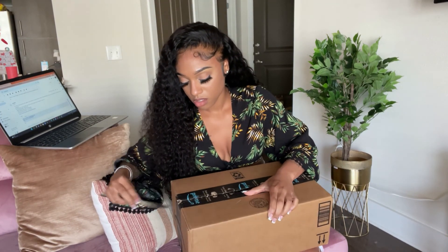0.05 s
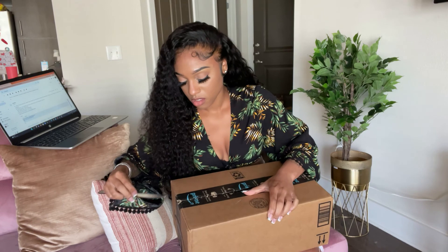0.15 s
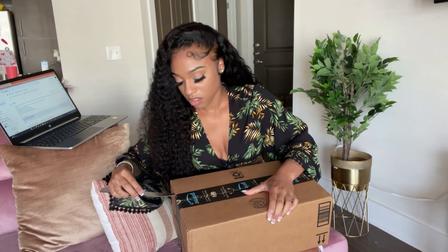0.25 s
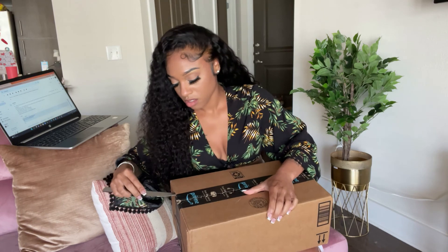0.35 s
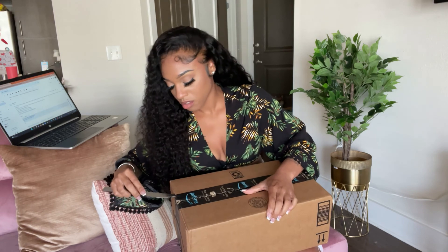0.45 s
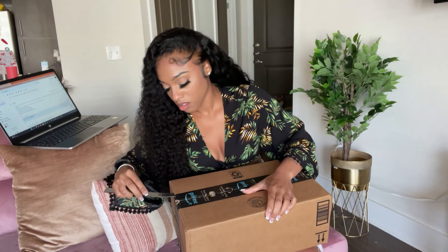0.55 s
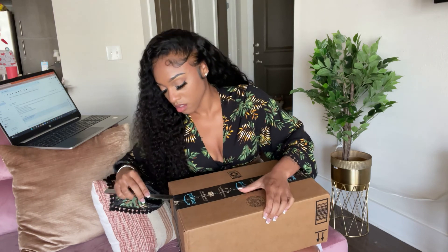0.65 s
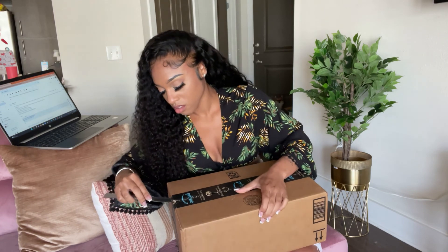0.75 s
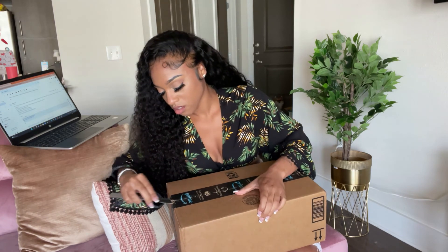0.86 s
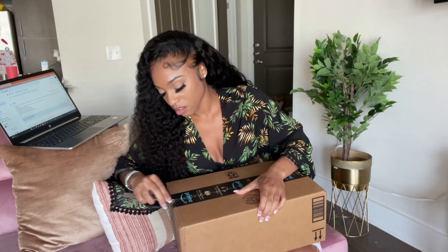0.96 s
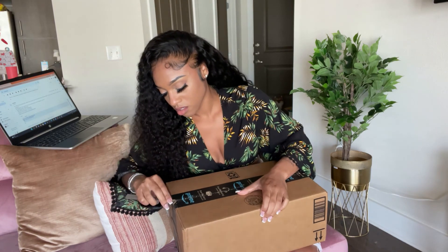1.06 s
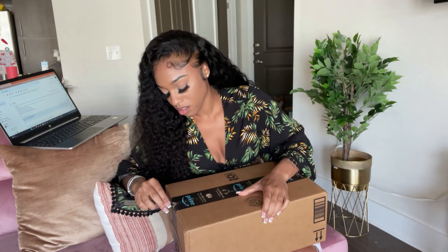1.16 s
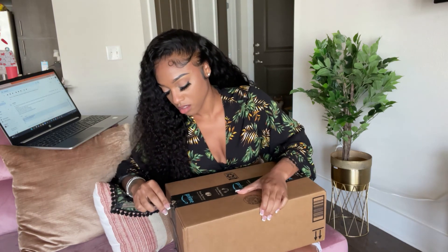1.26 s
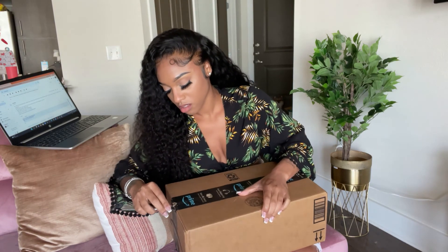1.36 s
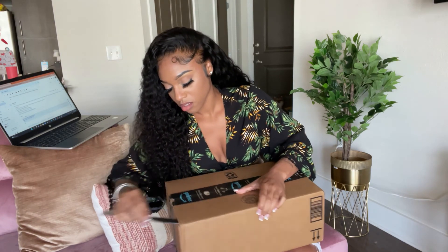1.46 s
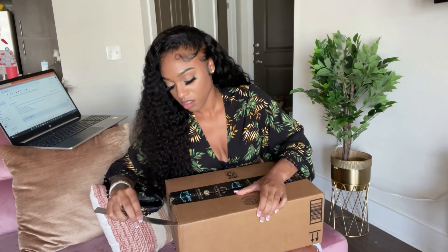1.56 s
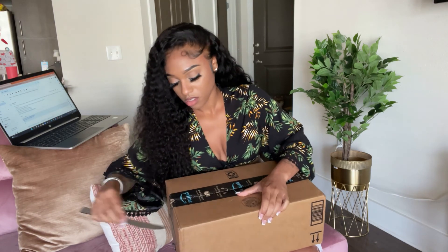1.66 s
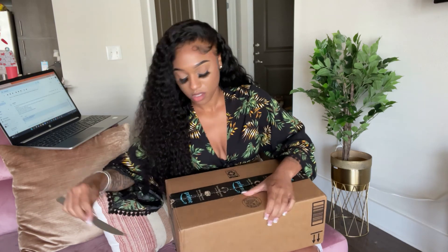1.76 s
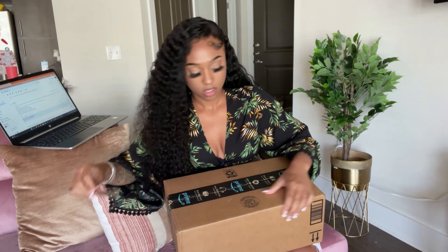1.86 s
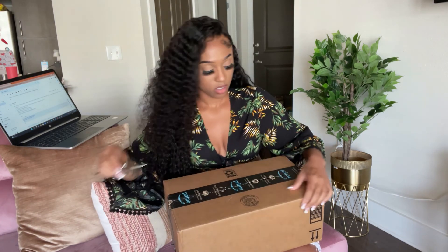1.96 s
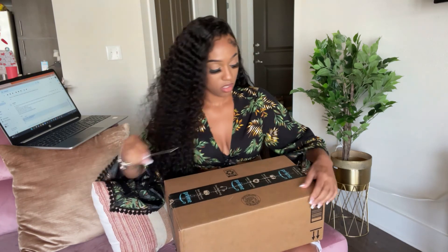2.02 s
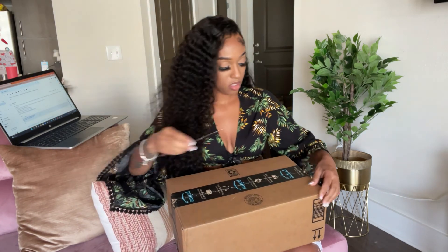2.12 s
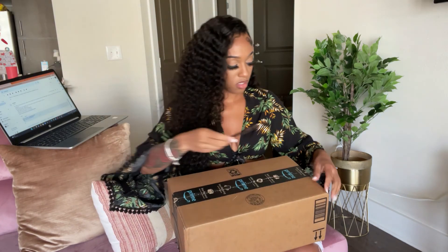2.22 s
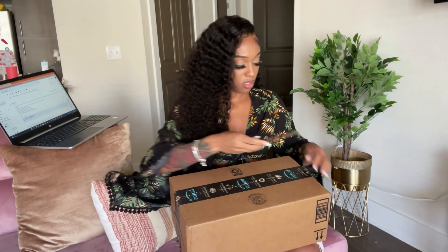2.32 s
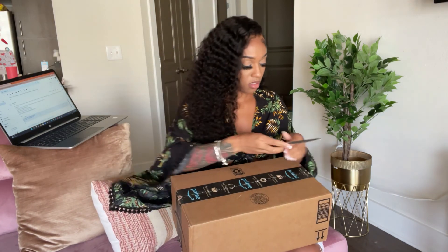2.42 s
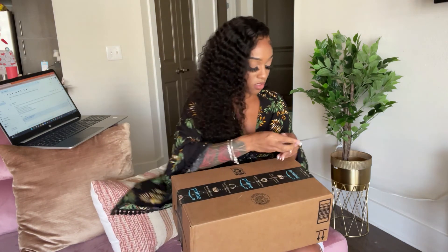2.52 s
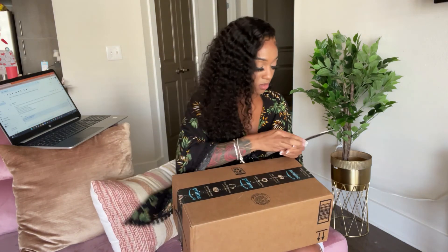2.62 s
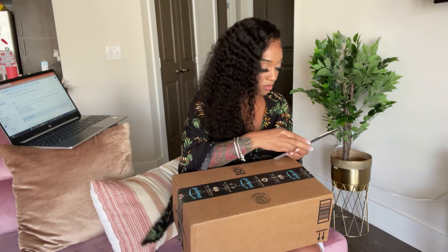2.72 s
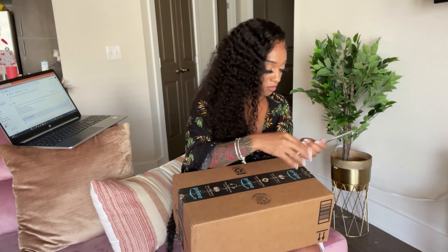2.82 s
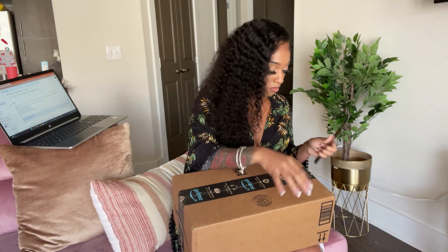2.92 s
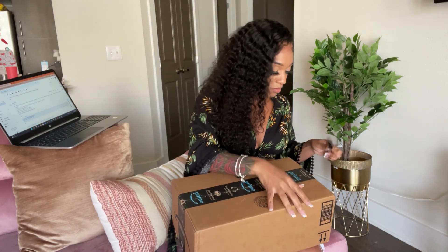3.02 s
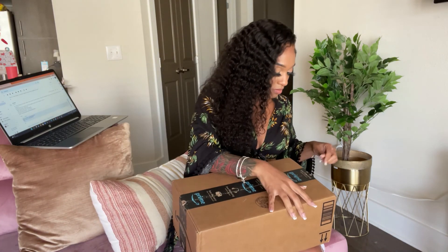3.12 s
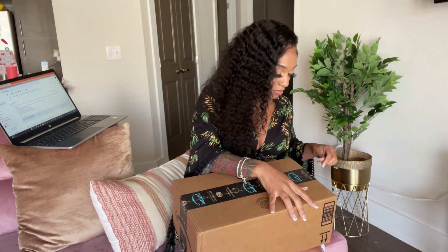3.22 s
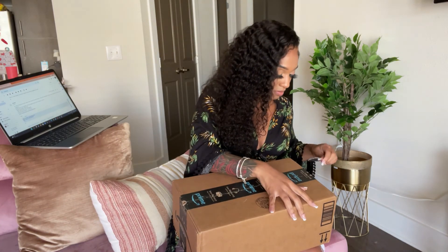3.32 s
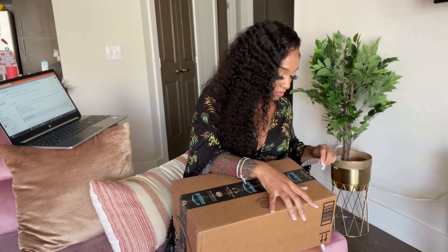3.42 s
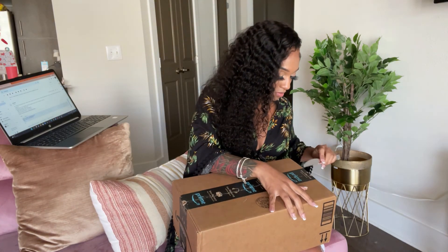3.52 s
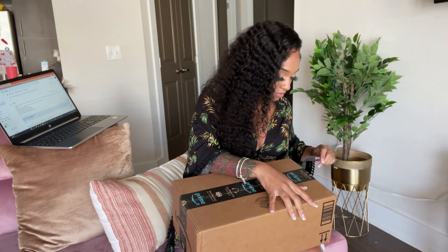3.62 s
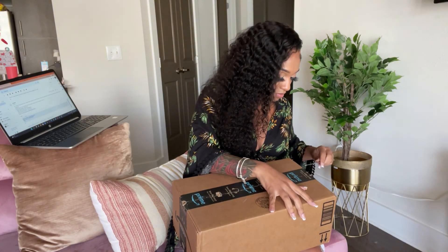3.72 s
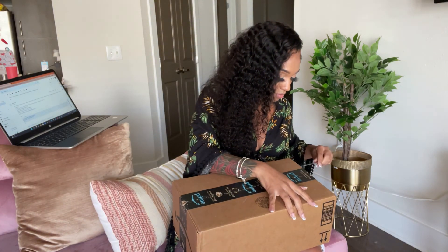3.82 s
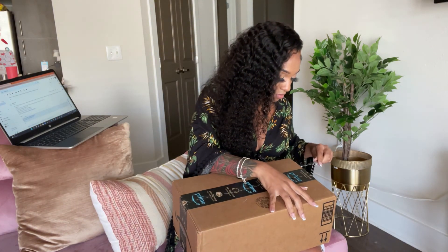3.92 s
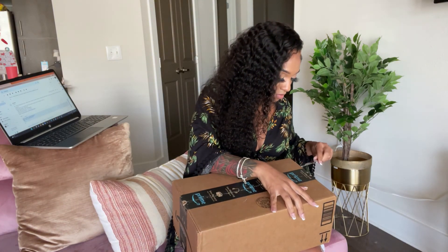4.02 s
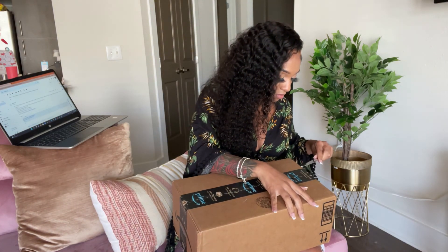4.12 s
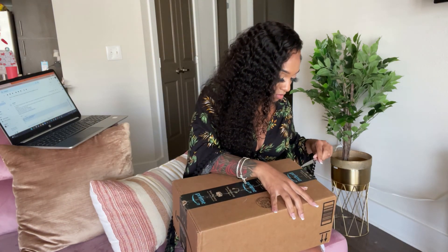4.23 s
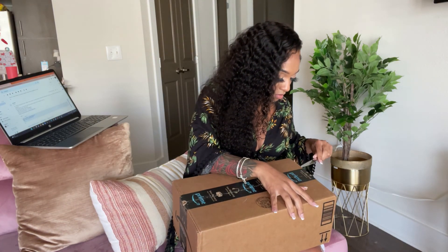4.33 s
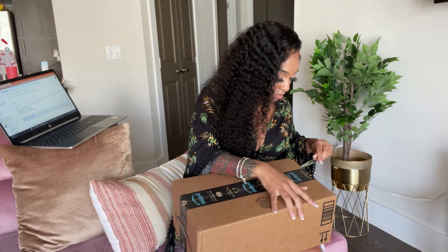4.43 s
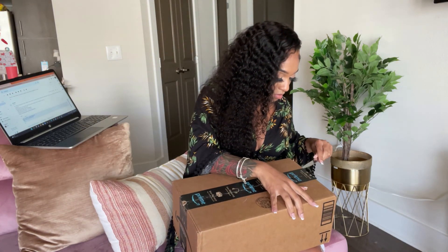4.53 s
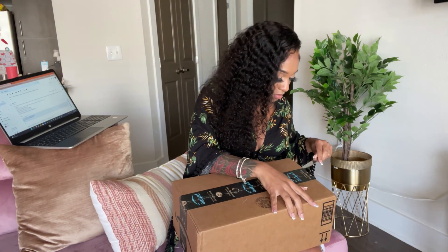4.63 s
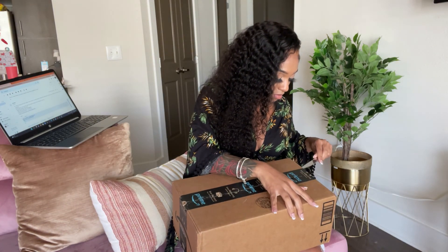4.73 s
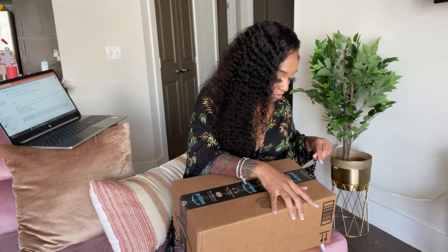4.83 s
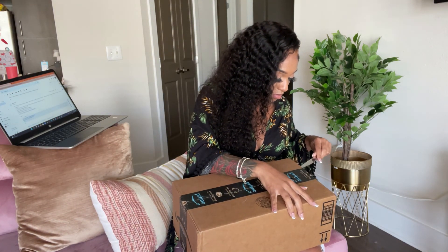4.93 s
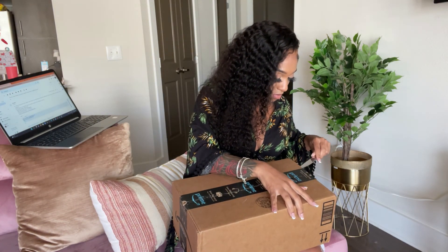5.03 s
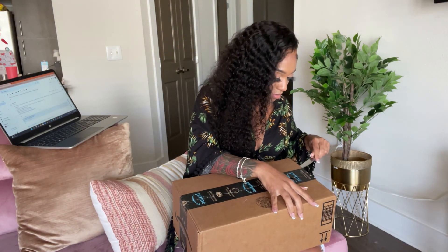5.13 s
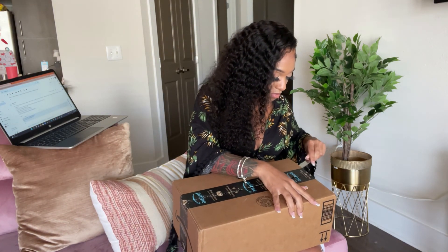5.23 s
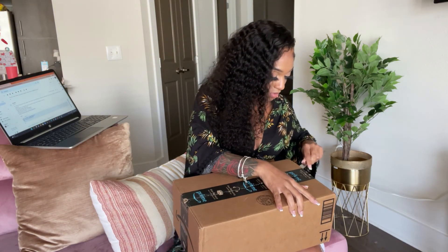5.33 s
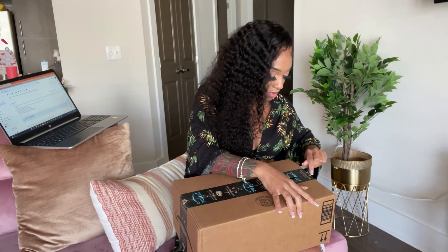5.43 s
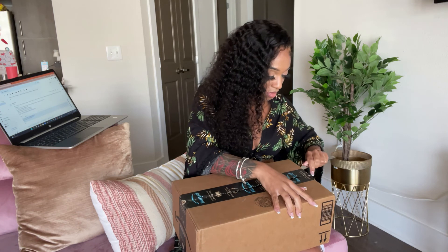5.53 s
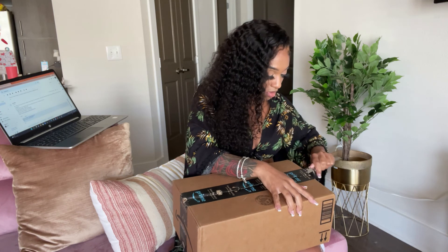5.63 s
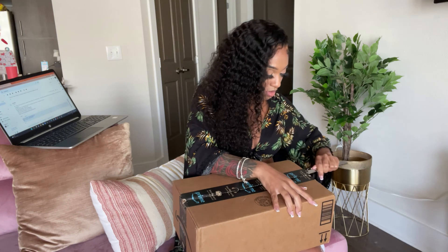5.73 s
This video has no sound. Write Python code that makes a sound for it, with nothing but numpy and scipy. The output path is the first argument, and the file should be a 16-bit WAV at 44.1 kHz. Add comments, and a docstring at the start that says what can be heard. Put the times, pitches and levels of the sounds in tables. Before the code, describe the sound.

A knife slits box tape. Dry clicks and scrapes open, then three crackling, boxy bursts get stronger, with soft cushion thumps. Cloth brushes as the hands change over, a faint airy swish passes, and a hand lands on the cardboard. Mostly low hum and soft room air remain until a last short tearing cluster. The microphone is near, in a lightly reverberant room.

```python
"""A blade saws and slits the packing tape of a cardboard box in a living room, near a two-port microphone.
Stick-slip clicks and single knocks ring the box panels as decaying sines; tape and sleeve hiss as fine
grains, jolts add snapping fibres and a thump of the cushions, and a sweep of the knife hand sings faintly.
Sparse decaying taps make the room's answer; steady hum tones lie under soft, slowly swelling room air."""
import sys
import numpy as np
from scipy import signal
from scipy.fft import rfft, irfft, next_fast_len
from scipy.io import wavfile
from scipy.ndimage import uniform_filter1d

SR = 44100
rng = np.random.default_rng(int(sys.argv[2]) if len(sys.argv) > 2 else 0)


def transcribe(u):
    """Save the signal u as a 16-bit wav file named by the first command-line argument.

    u: samples, shape (n,) or (channels, n), limited to [-1, 1]; the rate is SR.
    q: integer samples, one column per channel.
    """
    v = np.clip(np.atleast_2d(u).T, -1, 1)
    q = np.round(v * 32767).astype(np.int16)
    wavfile.write(sys.argv[1], SR, q)


N = 254447

# box panel modes: (frequency [Hz], relative level [dB], t60 before any lengthening [s])
BOX_MODES = [(96, 1, 0.029), (138, -10, 0.041), (189.5, -8.5, 0.034), (269, 2, 0.041), (350, 1.5, 0.048),
             (427.4, 3, 0.035), (507.8, 0.5, 0.067), (635, 5, 0.033), (747.5, -6, 0.11), (882, -9.5, 0.038),
             (1008, -5.5, 0.018), (1179, -12.5, 0.049), (1276, -12, 0.037), (1370, -14.5, 0.038),
             (1512, -19, 0.05), (1695, -15, 0.05), (1770, -15.5, 0.017), (1983, -18, 0.049),
             (2230, -12.5, 0.02), (2443, -16.5, 0.021), (2620, -12.5, 0.014), (3000, -37, 0.0075),
             (3120, -11, 0.01), (3690, -15.5, 0.0074)]
# spectrum of snapping tape fibres: (frequency [Hz], relative level [dB])
CRACK_SPECTRUM = [(800, 4), (1500, 27), (4000, 20.5), (6000, 19.5), (9000, 14.5), (12000, 17.5),
                  (16000, 7.5)]
MODE_HZ = np.array(BOX_MODES)[:, 0]
STIFF_ABOVE_HZ = 850
FIDGET_S = 0.039  # smoothing span of hand motion


def handling():
    """Drive of middle panels, stiff panels, rocking, hiss; rest, slides and jolts add in power."""
    # slides of blade, hand and sleeve: (peak time [s], swell [s], fade [s], rubbing on middle panels [dB],
    # rubbing on stiff panels [dB], hiss [dB])
    slides = [(.05, 0.043, 0.018, -41, -58, -54), (0.33, 0.18, 0.1, -56, -61.5, -72),
              (0.54, 0.057, 0.03, -55.5, -56, -59.5), (0.7, 0.037, 0.12, -40.5, -45, -50),
              (1.03, 0.055, 0.2, -53.5, -57.5, -60.5), (1.6, 0.078, 0.047, -47, -48, -58),
              (1.886, 0.08, 0.063, -83, -51.5, -41.5), (2.62, 0.094, 0.32, -70, -68, -66),
              (2.97, 0.11, 0.051, -58.5, -74, -58.5), (3.84, 0.018, 0.038, -52.5, -61.5, -72),
              (4.91, 0.028, 0.047, -53.5, -62.5, -73), (5.2, 0.055, 0.044, -56, -62, -64.5),
              (5.33, 0.046, 0.059, -63, -61, -60), (5.55, 0.032, 0.058, -55, -73, -60),
              (5.74, .05, .1, -44, -67, -73)]
    # blade breaks through or hand lands: (peak time [s], rise [s], scraping on middle panels [dB],
    # scraping on stiff panels [dB], rocking [dB], hiss [dB])
    jolt_list = [(0.008, 0.18, -34, -42, -51, -40.5), (0.786, 0.012, -32.5, -38, -33, -33),
                 (1.19, 0.018, -37, -37, -27, -30.5), (1.411, 0.011, -43, -49, -28, -28.5),
                 (1.459, 0.031, -30, -57, -29, -28.5), (3.002, 0.021, -37, -40, -54, -52.5),
                 (5.607, 0.018, -34.5, -49, -32.5, -30), (5.645, .01, -32.5, -49, -44, -32.5),
                 (5.68, .02, -40, -57, -39, -54)]
    # hands resting on the box: (middle panels [dB], stiff panels [dB], rocking [dB], hiss [dB])
    rest_db = (-78, -69, -55, -75)
    # fall after a jolt: (middle panels [dB/s], stiff panels [dB/s], rocking [dB/s], hiss [dB/s])
    settle_db_per_s = (105, 121, 93, 400)
    # unsteady hands, rms: (middle panels [dB], stiff panels [dB], rocking [dB], hiss [dB])
    fidget_db = (2.2, 1.2, 3.3, 1.6)
    slide_edge_db = -2  # one swell before and one fade after the peak
    slide_rock_db = -5.5  # rocking re rubbing on middle panels
    rise_from_db = -20  # one rise before the jolt peak

    t = np.arange(N) / SR
    power = np.ones((4, N)) * gain_of(np.array(rest_db)[:, None]) ** 2
    for peak_s, swell_s, fade_s, rub_db, stiff_db, hiss_db in slides:
        shape_db = slide_edge_db * ((t - peak_s) / np.where(t < peak_s, swell_s, fade_s)) ** 2
        peak_db = np.array([[rub_db], [stiff_db], [rub_db + slide_rock_db], [hiss_db]])
        power += gain_of(peak_db + shape_db) ** 2

    jolt_power = np.zeros((4, N))
    for peak_s, rise_s, *peak_db in jolt_list:
        rise_db = rise_from_db * (peak_s - t) / rise_s
        settle_db = np.array(settle_db_per_s)[:, None] * (peak_s - t)
        shape_db = np.where(t < peak_s, rise_db, settle_db)
        jolt_power += gain_of(np.array(peak_db)[:, None] + shape_db) ** 2

    fidget = gain_of([db * np.clip(wander(FIDGET_S), -2, 2) for db in fidget_db])
    return np.sqrt(power + jolt_power) * fidget, np.sqrt(jolt_power)


def dragging(drives):
    """Stick-slip clicks of the blade ring the panels, most near the touch; rocking moves the lowest."""
    # where the blade presses: (time [s], middle panel [Hz], stiff panel [Hz])
    touch = [(0, 430, 1210), (.66, 477, 1160), (.75, 410, 1130), (.9, 400, 1270), (1.19, 430, 2170),
             (1.3, 400, 2150), (1.41, 350, 1200), (1.5, 400, 1320), (3, 350, 1010), (4.9, 498, 1050),
             (5.2, 483, 1310), (5.28, 506, 2150), (5.4, 470, 2150), (5.6, 460, 1300), (5.66, 400, 2100),
             (5.77, 430, 1100)]
    middle_reach_db, stiff_reach_db = 8, 2.5  # touched panel re far ones
    touch_wander = .06  # rms share of touched frequency

    touch_s, *touched = np.transpose(touch)
    low, stiff = MODE_HZ < 200, MODE_HZ > STIFF_ABOVE_HZ
    signs = rng.choice([-1., 1.], (len(BOX_MODES), 1))
    clicks = slips(1500, 3.15)
    rings = signal.oaconvolve(clicks[None], signs * panels(), axes=1)[:, :N]
    roam = 1 + touch_wander * wander(FIDGET_S)
    parts = []
    groups = (~low & ~stiff, stiff)
    for group, under_hz, reach_db in zip(groups, touched, (middle_reach_db, stiff_reach_db)):
        touched_hz = np.interp(np.arange(N) / SR, touch_s, under_hz) * roam
        share = gain_of(reach_db * nearness(touched_hz)[group])
        ring_power = np.mean(rings[group] ** 2, axis=1, keepdims=True)
        power = (share ** 2 * ring_power).sum(axis=0)
        parts.append((share * rings[group]).sum(axis=0) / np.sqrt(power))
    parts.append(evened(rings[low].sum(axis=0)))
    return sum(drive * part for drive, part in zip(drives, parts))


def slips(per_s, spread_db):
    """Random clicks of either sign, a few of them large."""
    size = gain_of(spread_db * np.minimum(rng.exponential(1, N), 4)) * rng.choice([-1., 1.], N)
    return size * (rng.random(N) < per_s / SR)


def panels(bend=1, linger=1):
    """Decaying sine of each panel after one blow; bend scales pitch, linger scales t60."""
    t = np.arange(SR // 4) / SR
    hz, db, t60_s = np.transpose(BOX_MODES)[:, :, None]
    return gain_of(db - 60 * t / (t60_s * linger)) * np.sin(2 * np.pi * hz * bend * t)


def nearness(touched_hz):
    """Closeness of each panel to the touched one in log frequency, 0-1."""
    octaves = np.log2(MODE_HZ[:, None] / touched_hz)
    return np.exp(-(octaves / .22) ** 2)


def knocks():
    """Blows ring panels through a soft contact, stiff ones crumple on; the tape adds a short crack."""
    # single snaps and knocks: (time [s], middle-panel peak [dB], low panels re middle [dB],
    # stiff panels re middle [dB], tape crack re middle [dB], struck middle panel [Hz],
    # struck stiff panel [Hz], struck panels' emphasis [dB], their t60 factor [1], contact time constant [ms])
    blows = [(0.007, -29, -30, -0.5, -6, 450, 2300, 6.5, 1.3, 0.051),
             (0.018, -25, -27, -35, -5.5, 480, 1200, 14, 3.2, 0.14),
             (0.325, -48.5, 9, -11, 5.5, 510, 1200, 13, 0.97, .03),
             (0.739, -33, 0, 4.5, 2, 406, 1090, 22, 0.87, 0.055),
             (0.761, -41, 16, -17, -25, 190, 1200, 14, 1.6, 0.27),
             (0.772, -22, -19, -9, 4.5, 420, 1110, 7.6, 1, 0.028),
             (0.779, -21.5, -1, -2.5, 3.5, 400, 1150, 10, 1.2, 0.038),
             (0.79, -31.5, -20, 10, 11, 406, 1220, 14, 0.57, 0.03),
             (0.808, -27, -14, 3, -9, 417, 1290, 13, 0.79, 0.052),
             (0.817, -27, -1, -11, -23, 191, 1200, 26, 1.3, 0.11),
             (0.838, -29, -15, 2.5, 2, 358, 1190, 7.1, 0.72, 0.1),
             (0.858, -35, -12, 7, 2, 420, 2240, 11, 1.3, 0.029),
             (0.975, -33.5, 0.5, -26, -23, 370, 1200, 5.7, 0.92, 0.34),
             (1.177, -37, -1, 14, 8, 580, 1900, 7, 1.9, 0.023),
             (1.188, -26, -14, 2, 7.5, 500, 1490, 7.8, 0.55, 0.066),
             (1.193, -24, -15, 3.5, 6, 503, 1400, 5.2, 0.94, 0.034),
             (1.198, -20.5, -18, 1.5, -16, 580, 1000, 11, 1.1, 0.028),
             (1.203, -24, 3, -1, -14, 290, 2220, 14, 1.7, 0.031),
             (1.211, -28, 11.5, 4.5, -25, 144.5, 2250, 24.5, 1.5, 0.031),
             (1.228, -31.5, -10, 6, -15, 480, 2370, 18, 1.7, 0.036),
             (1.24, -34, 8.5, 6, -25, 250, 950, 20, 1, .05),
             (1.408, -21.5, -12, 5.5, -10, 735, 2320, 14, 0.93, 0.029),
             (1.413, -13, -7, -5, -4.5, 358, 1880, 19, 1, 0.025),
             (1.422, -16, -1, -18, -26, 302, 1200, 12, 0.86, 0.14),
             (1.429, -18, 1, 6, -23, 290, 1110, 8.2, 1.6, 0.05),
             (1.435, -23, 2, -8, -16, 270, 1120, 14, 0.57, 0.079),
             (1.443, -19, -7, -6, -20, 344, 2370, 9.5, 1.4, 0.021),
             (1.454, -20.5, -19, 2, -22, 150, 1060, 6.3, 0.76, 0.058),
             (1.465, -25, -14, 0, -4, 507, 1930, 21, 1.4, 0.032),
             (1.481, -27, -1, -11, -20, 400, 1300, 12, 1.1, 0.044),
             (1.506, -32.5, 8, 2, -15, 238, 1300, 9.3, 1.2, 0.048),
             (1.609, -47, -6, 17, 14.5, 470, 1200, 8.3, 0.75, 0.033),
             (2.783, -46, -12, -7, 6.5, 536, 1180, 9.5, 1.3, 0.035),
             (2.994, -26, -21, 4.5, -17, 750, 1000, 25, 1.5, 0.022),
             (2.997, -23, -14, -23, -40, 348, 1000, 24, 1.85, 0.12),
             (3.011, -32, -22, 0, -22, 710, 1400, 11, 1.6, 0.04),
             (3.034, -32, -22, 5, -17, 735, 1770, 6.7, 1.5, 0.028),
             (3.059, -46, -15, -13, -35, 350, 1000, 16, .6, .1),
             (3.449, -35, -4.5, -15.5, -15, 410, 1200, 7.3, 2, 0.16),
             (4.894, -41.5, 4.5, -3.5, -30, 483, 1030, 14, 3.3, 0.1),
             (5.18, -39, -17, -3, -8, 454, 2300, 6.7, 1.7, 0.032),
             (5.207, -43, -24, -19, -30, 446, 1200, 21, 1.4, .08),
             (5.258, -47, -10, 10, 6, 627, 2130, 10, 1, 0.01),
             (5.547, -54.5, -19, 21, 28.5, 390, 3470, 23, 1.4, 0.013),
             (5.594, -40, -19, 7, -12, 450, 1290, 12, 1.5, 0.066),
             (5.605, -27, -15, -2, -8, 430, 990, 7.4, 1.2, .05),
             (5.612, -24, -24, 2, -9, 480, 1300, 8.1, 2.2, 0.056),
             (5.618, -24.5, -25, 0, -15, 480, 910, 10, 1.5, 0.094),
             (5.648, -19.5, -20, 5.5, -3, 537, 970, 27, 0.55, 0.085),
             (5.649, -30, -22, 10.5, -8, 547, 2150, 34, 0.73, 0.025),
             (5.653, -15, -16, -11, -22, 624, 1260, 13, 1.35, 0.048),
             (5.657, -26, 4, -8, -25, 285, 900, 16, 1.7, 0.092),
             (5.673, -28, 12, -7, -25, 105, 900, 15, 1, 0.27),
             (5.737, -34, 7, -11, -27, 140, 1000, 21, 2.1, 0.15)]
    out, t = np.zeros(N + SR), np.arange(SR // 20) / SR
    low, stiff = MODE_HZ < 300, MODE_HZ > STIFF_ABOVE_HZ
    grit = rng.standard_normal((len(blows), 2, len(t) + len(BOX_MODES)))
    for settings, (noise, crumbs) in zip(blows, grit):
        s, db, low_db, stiff_db, crack_db, hz, stiff_hz, focus_db, linger, contact_ms = settings
        near = np.maximum(nearness(hz), nearness(stiff_hz))
        bend = 1 + noise[len(t):, None] / 50
        signs = np.sign(crumbs[len(t):, None])
        spot = gain_of(focus_db * near) * panels(bend, linger ** near) * signs
        press = t * np.exp(-t / (contact_ms / 1000))  # longer contact sounds duller
        spot = signal.oaconvolve(spot, press[None], axes=1)[:, :spot.shape[1]]

        crumple = (t == 0) + gain_of(-29.5 - 60 * t / 0.091) * crumbs[:len(t)]
        rattle = signal.oaconvolve(spot[stiff].sum(axis=0), crumple)[:spot.shape[1]]
        groups = spot[~low & ~stiff].sum(axis=0), spot[low].sum(axis=0), rattle
        levels_db = (0, low_db, stiff_db)
        blow = sum(gain_of(g) * ring / abs(ring).max() for g, ring in zip(levels_db, groups))

        fade = gain_of(-60 * t / .014) * np.minimum(t / .0003, 1)
        z = rfft(noise[:len(t)] * fade)
        snap = irfft(z / abs(z), len(t))  # flat spectrum
        crack = coloured(snap, CRACK_SPECTRUM) * np.sqrt(fade)
        blow[:len(t)] += gain_of(crack_db) * crack / abs(crack).max()
        out[round(s * SR):][:len(blow)] += gain_of(db) * blow
    return out[:N]


def hiss(drive):
    """Tape fibres and cloth: dense fine grains."""
    # (frequency [Hz], relative level [dB])
    hiss_spectrum = [(500, -2.5), (1500, 0), (2500, -2), (4000, -6), (7000, -6), (11000, -7),
                     (16000, -10.5)]
    return drive * evened(coloured(slips(9000, 3.1), hiss_spectrum))


def tearing(rock, rip):
    """In a jolt single fibres snap, and the cushions thump under the box."""
    # thump: (level [dB], spectrum of (frequency [Hz], relative level [dB]))
    thump_db, thump_spectrum = -35, [(20, -16), (35, 15), (60, -7), (90, -25), (200, -72)]
    crackle_db, crackle_per_s = -8, 400  # level re jolt hiss
    snaps = gain_of(crackle_db) * rip * evened(coloured(slips(crackle_per_s, 4), CRACK_SPECTRUM))
    rumble = evened(coloured(rng.standard_normal(N), thump_spectrum))
    return snaps + gain_of(thump_db) * rock * rumble


def swish():
    """Sweep of the knife hand: noise in narrow bands that swell, drift upward and fade."""
    # (frequency at mid-sweep [Hz], width of each of two poles [Hz], level before the swell [dB])
    swish_bands = [(2750, 500, -75), (4950, 380, -71), (7200, 450, -70)]
    middle_s, spread_s, glide = 2.92, .045, .02  # glide: pitch share either side of the middle
    t = np.arange(N) / SR
    place, out = (t - middle_s) / spread_s, np.zeros(N)
    for hz, width_hz, db in swish_bands:
        gliding_hz = hz * (1 + glide * np.tanh(place))
        carrier = np.exp(2j * np.pi * np.cumsum(gliding_hz) / SR)
        r = np.exp(-np.pi * width_hz / SR)
        two_poles = np.convolve([1, -r], [1, -r])
        slow = signal.lfilter([1], two_poles, rng.standard_normal(N) / carrier)
        out += gain_of(db) * evened((carrier * slow).real)
    return out * np.exp(-place ** 2 / 2)


def scatter(t60_s):
    """Short cloud of reflections: decaying noise whitened to leave the colour nearly alone."""
    t = np.arange(SR // 20) / SR
    z = rfft(rng.standard_normal(len(t)) * gain_of(-60 * t / t60_s))
    return irfft(z / abs(z), len(t)) * (t < t[-1] / 2)


def tails(start):
    """Two unrelated room tails of sparse taps, each band dying at its own speed, energy 1."""
    # (frequency [Hz], t60 [s])
    room_t60 = [(100, 0.13), (300, 0.6), (1000, 0.67), (4000, 0.86), (12000, 0.45)]
    taps = np.zeros((2, SR))
    slots = np.arange(start, SR - 20, 20)
    at = slots + rng.integers(0, 20, (2, len(slots)))
    np.put_along_axis(taps, at, rng.choice([-1., 1.], at.shape), 1)
    hz, t, z = signal.stft(taps, SR, nperseg=256)
    f, t60_s = np.transpose(room_t60)
    decay = gain_of(-60 * t / np.interp(hz, f, t60_s)[:, None])
    tail = signal.istft(z * decay, SR, nperseg=256)[1]
    return tail / np.linalg.norm(tail, axis=1, keepdims=True)


def air():
    """Coloured noise with a slow swell, and steady hum sines."""
    # (frequency [Hz], relative level [dB])
    air_spectrum = [(20, -21), (40, 9), (80, 7), (130, 14), (200, -38), (250, 2.5), (400, -1), (850, -7),
                    (1200, -23.5), (2500, -19), (5500, -24), (8000, -26.5), (11000, -33), (13000, -51),
                    (14500, -73)]
    # (frequency [Hz], rms level in each field [dB])
    hum_tones = [(120.1, -46.5), (240, -64), (830, -69)]
    air_db, swell_db = -52, 0.67
    t = np.arange(N) / SR
    swell = evened(uniform_filter1d(rng.standard_normal(N), 6000))
    wash = evened(coloured(rng.standard_normal((2, N)), air_spectrum))
    shifted_s = t + np.array([[0], [1 / 480]])  # scattered field: quarter cycle ahead near 120 Hz
    hum = sum(gain_of(db) * np.sqrt(2) * np.sin(2 * np.pi * (hz * shifted_s + rng.random()))
              for hz, db in hum_tones)
    return gain_of(air_db + swell_db * swell) * wash + hum


def gain_of(db):
    """Decibels to an amplitude factor."""
    return 10 ** (np.asarray(db) / 20)


def evened(x):
    """Scales to rms 1."""
    return x / np.sqrt(np.mean(x ** 2) + 1e-20)


def coloured(x, points):
    """Filters along time by a (frequency [Hz], level [dB]) spectrum."""
    f, db = np.transpose(points)
    hz = np.fft.rfftfreq(x.shape[-1], 1 / SR)
    return irfft(rfft(x) * gain_of(np.interp(np.log(hz + 1), np.log(f), db)), x.shape[-1])


def wander(span_s):
    """Twice-smoothed noise of rms 1."""
    width = round(span_s * SR)
    return evened(uniform_filter1d(uniform_filter1d(rng.standard_normal(N), width), width))


def scene():
    """Two sound fields: the direct one, and one scattered by the nearby cushions."""
    room_db, turn_s = -8, .23
    (*drives, hiss_drive), (*_, rock, rip) = handling()
    box = dragging(drives) + hiss(hiss_drive) + knocks() + swish()
    highpass = signal.butter(4, 72, "high", fs=SR, output="sos")
    near = signal.sosfilt(highpass, box) + tearing(rock, rip)
    out = air()
    out[0] += near
    t = np.arange(N) / SR
    for k in range(3):  # three random scatters and room tails fade into one another: the image keeps shifting
        part = near * np.sqrt(2 / 3) * np.cos(np.pi * (t / turn_s + k / 3))
        out[1] += signal.oaconvolve(part, scatter(t60_s=0.022))[:N]
        out += gain_of(room_db) * signal.fftconvolve(part[None], tails(start=300), axes=1)[:, :N]
    return out


def record(dry):
    """Ports share the direct field, hear the scattered one in opposite sign; right phase lead, band limit."""
    # (frequency [Hz], left-right likeness [0-1], left over right [dB])
    ports = [(30, 0.66, -2), (130, 1, -2.5), (350, 0.44, -4), (716, 0.08, -0.5), (1400, 0.17, -0.5),
             (2330, 0, -1.5), (4000, 0.05, 0), (5800, 0.3, -1.5), (7200, 0.1, 0), (8830, 0.89, 1.5),
             (10100, 0.88, -1), (12000, 0.73, 1.5), (13100, 0.9, -3), (14400, 0.87, 3), (16400, 0.8, 1)]
    # (frequency [Hz], phase lead of the right port [rad])
    right_lead = [(0, 0), (1400, .5), (2400, 1.9), (4000, 2), (5800, 0), (8800, -3.14), (14300, -9.42),
                  (16500, -11.9)]
    edge_hz = 15850
    size = next_fast_len(N + 4096)
    hz = np.fft.rfftfreq(size, 1 / SR)
    f, share, tilt_db = np.transpose(ports)
    share = np.clip(np.interp(hz, f, share), 0, 1)
    tilt = gain_of(np.interp(hz, f, tilt_db) / 2)
    direct, scattered = rfft(dry, size) * np.sqrt([(1 + share) / 2, (1 - share) / 2])
    left = direct + scattered
    right = (direct - scattered) * np.exp(1j * np.interp(hz, *np.transpose(right_lead)))
    pair = irfft(np.array([left * tilt, right / tilt]), size)[:, :N]
    lowpass = signal.firwin(511, edge_hz, window=("kaiser", 9), fs=SR)
    return signal.oaconvolve(pair, lowpass[None], "same")


dry = scene()
out = record(dry)
transcribe(out)
```